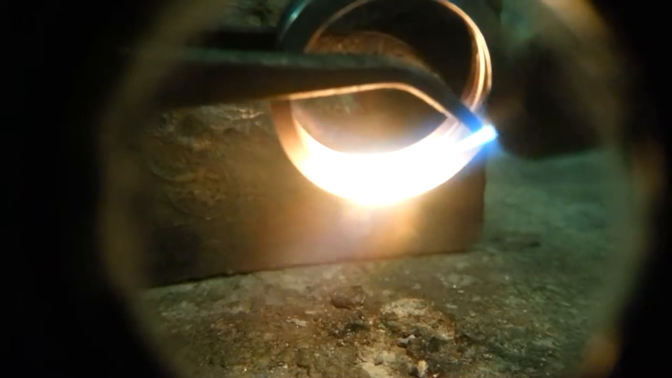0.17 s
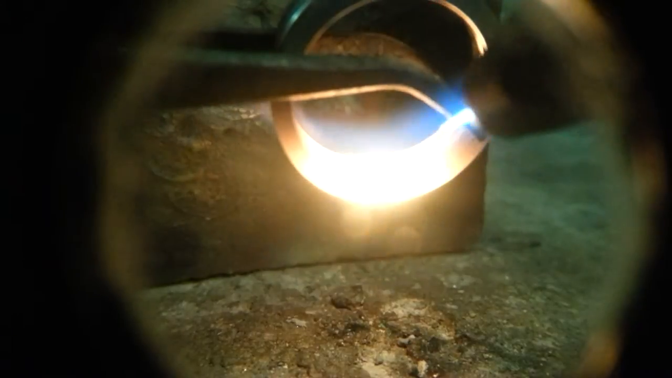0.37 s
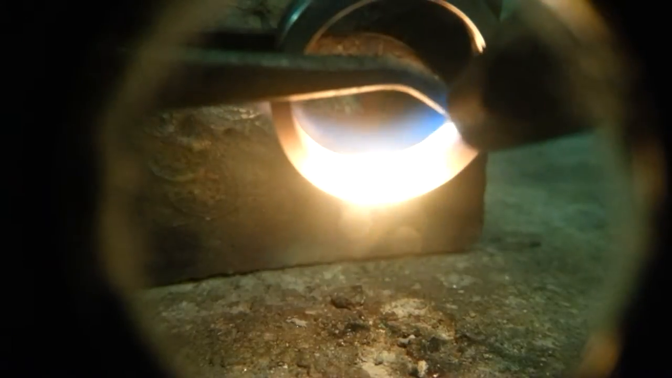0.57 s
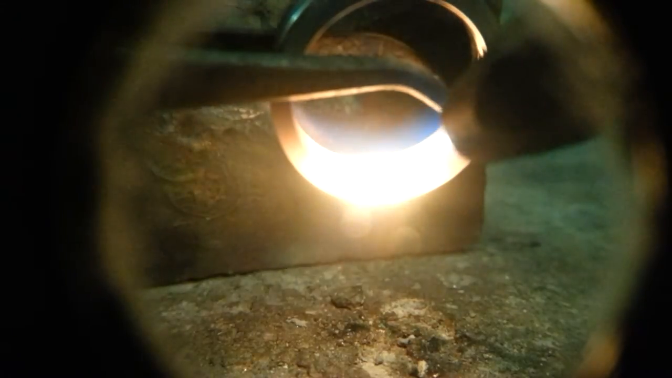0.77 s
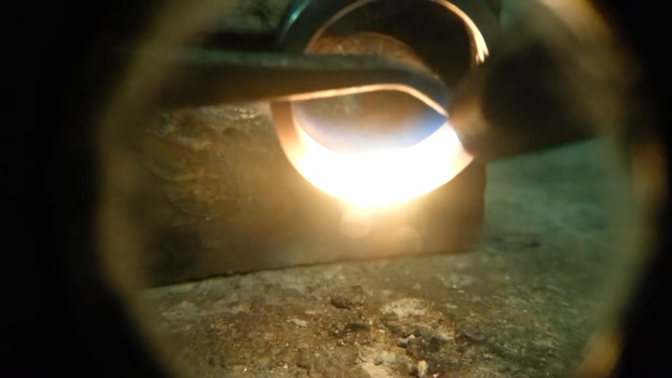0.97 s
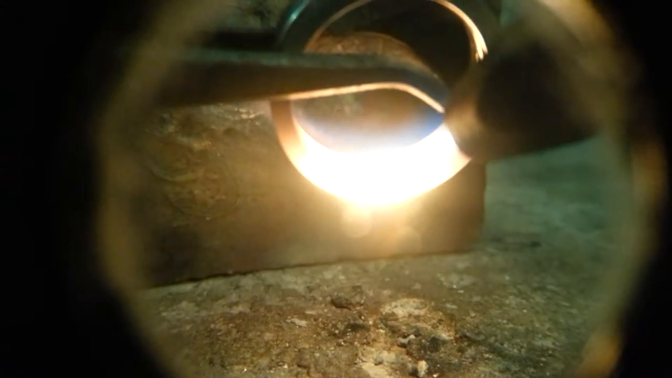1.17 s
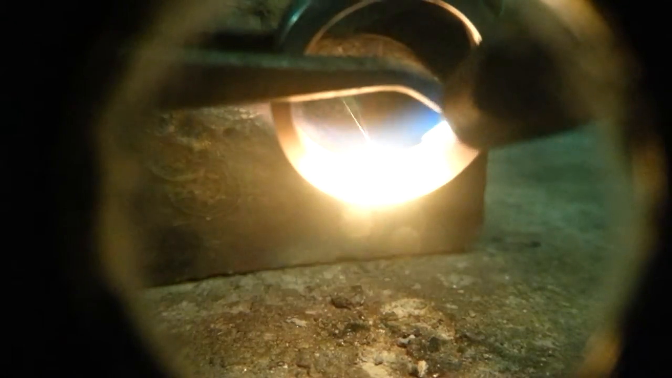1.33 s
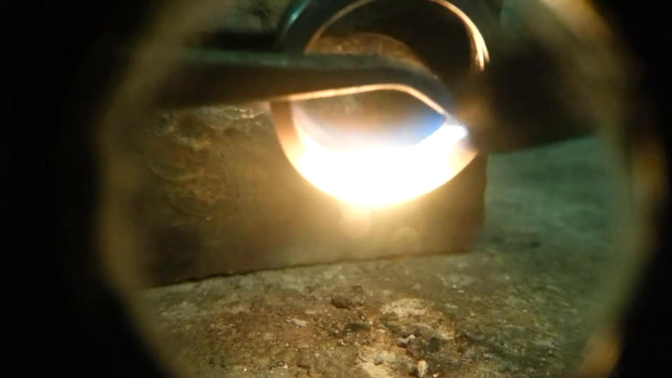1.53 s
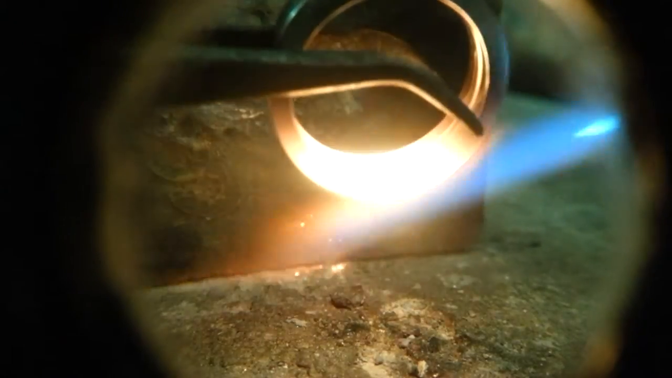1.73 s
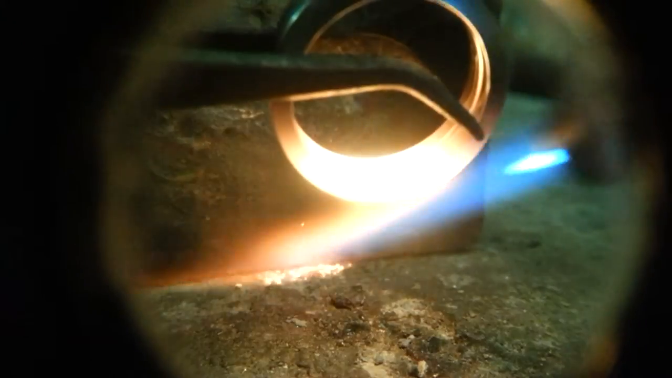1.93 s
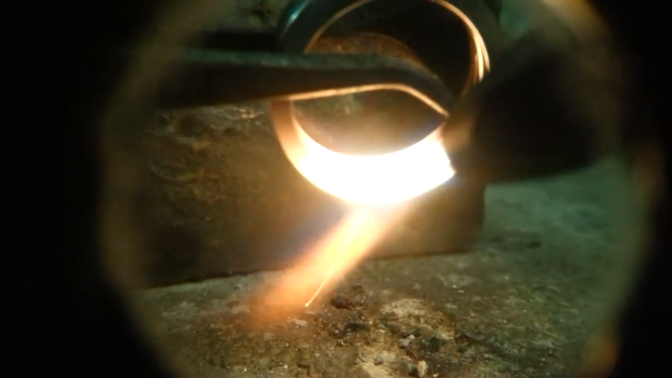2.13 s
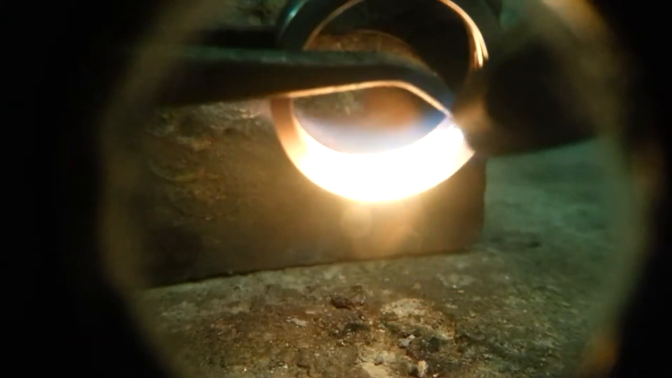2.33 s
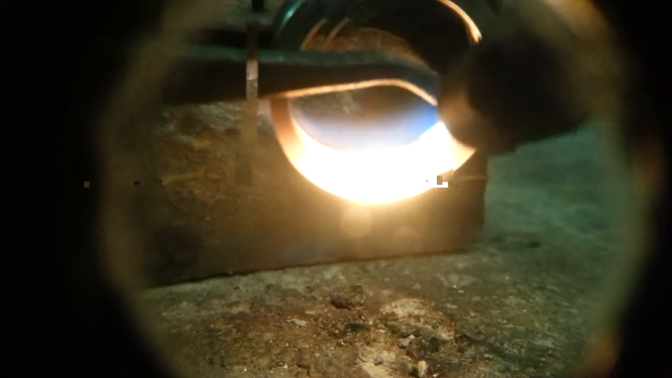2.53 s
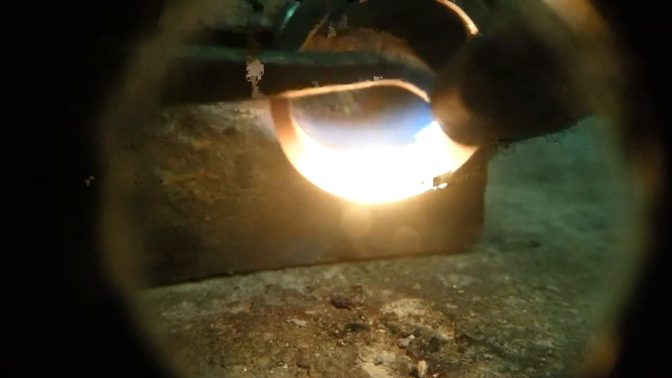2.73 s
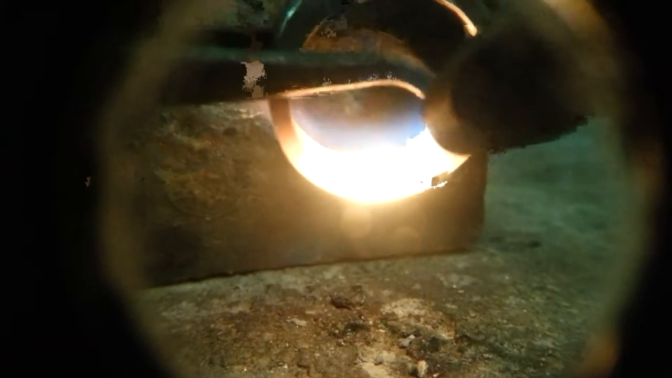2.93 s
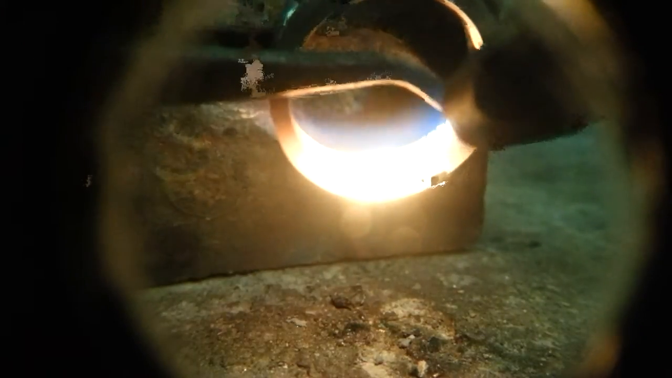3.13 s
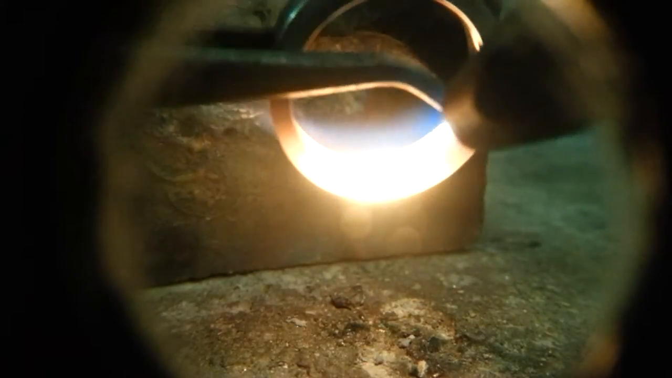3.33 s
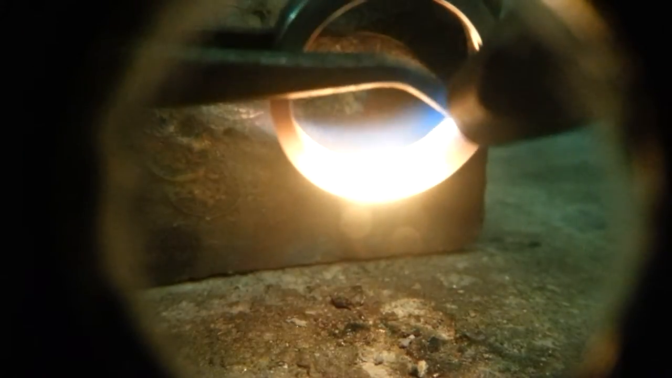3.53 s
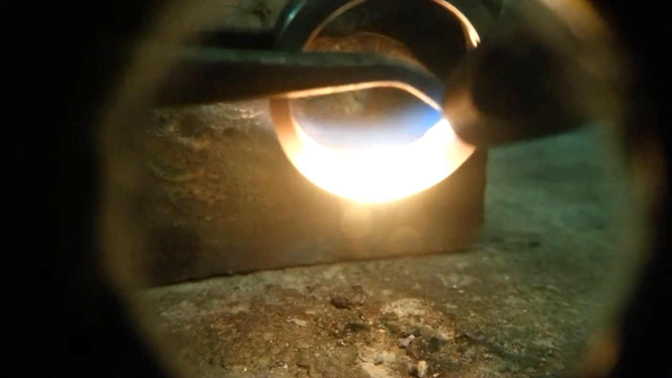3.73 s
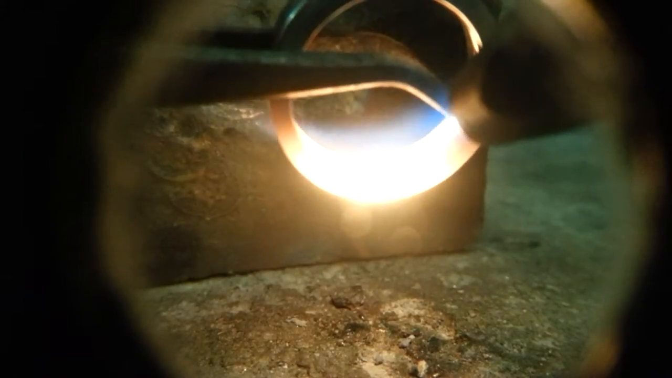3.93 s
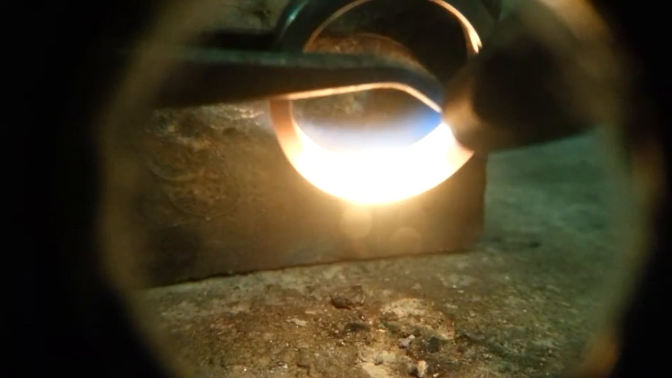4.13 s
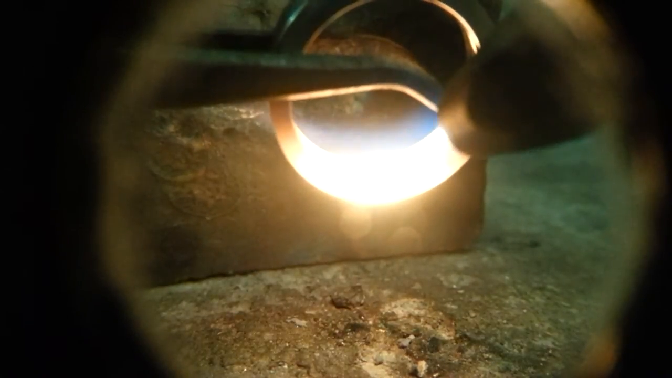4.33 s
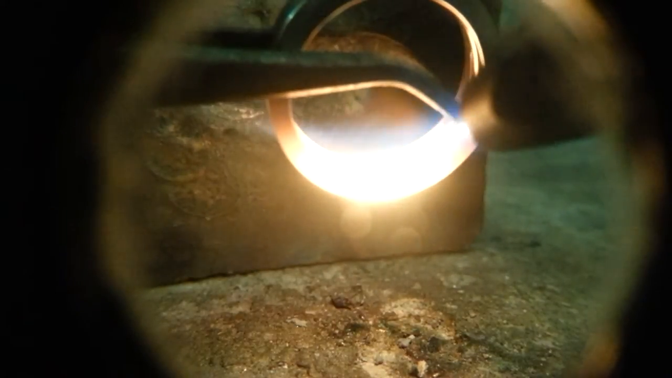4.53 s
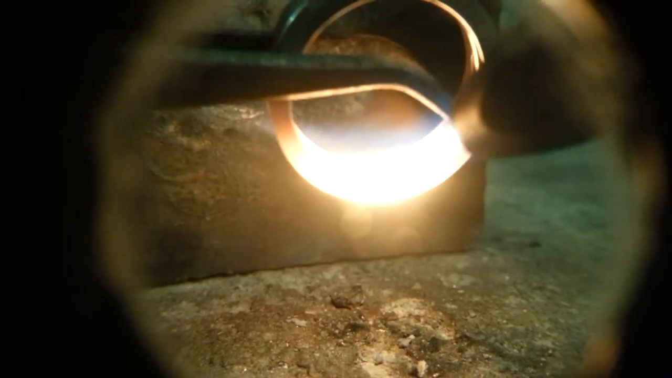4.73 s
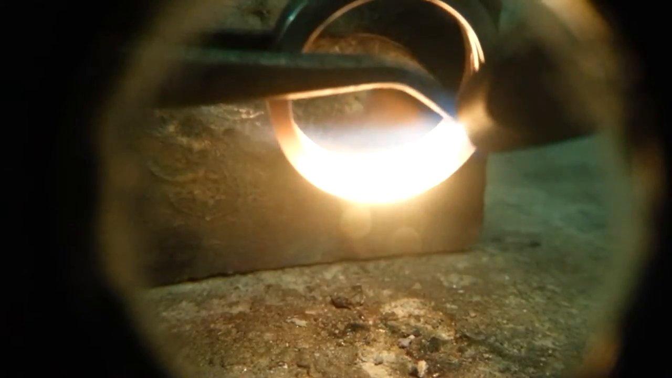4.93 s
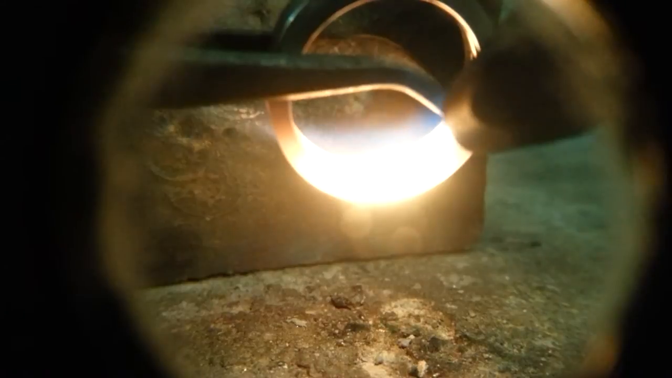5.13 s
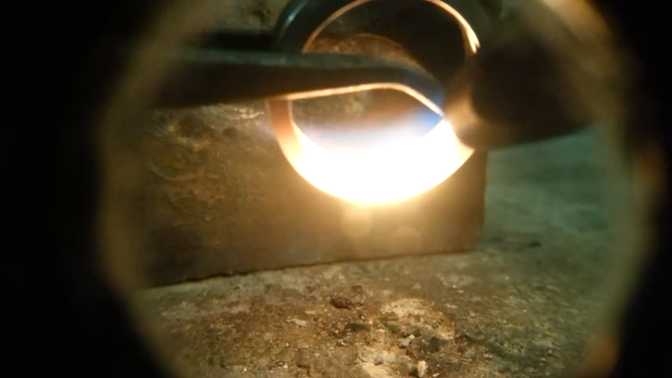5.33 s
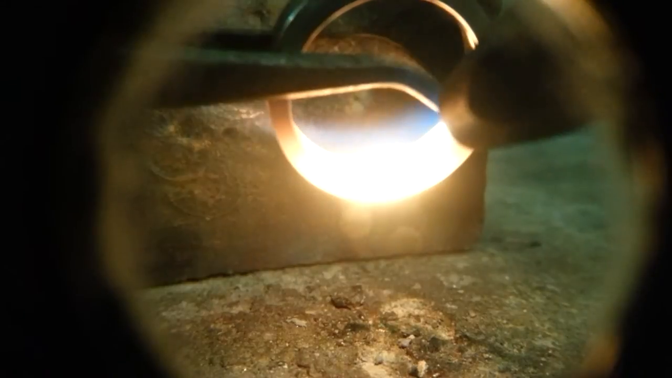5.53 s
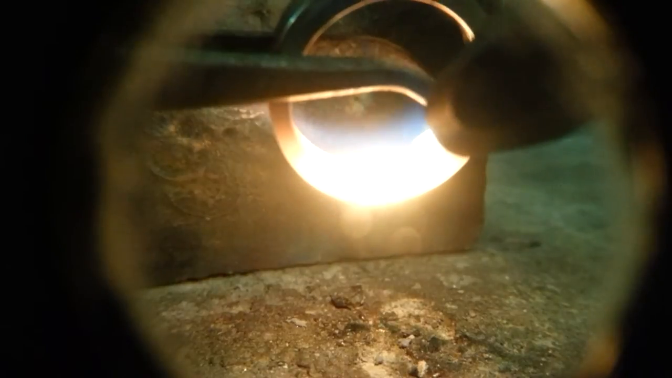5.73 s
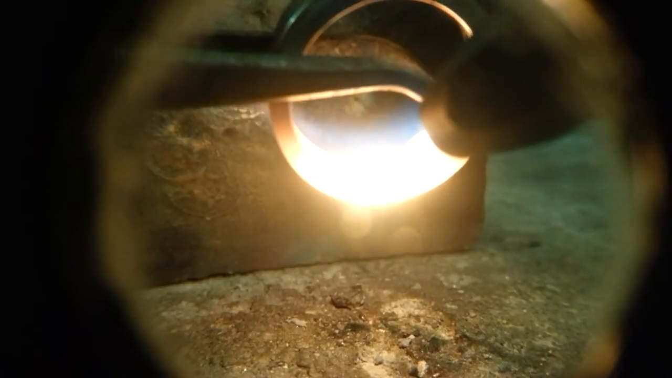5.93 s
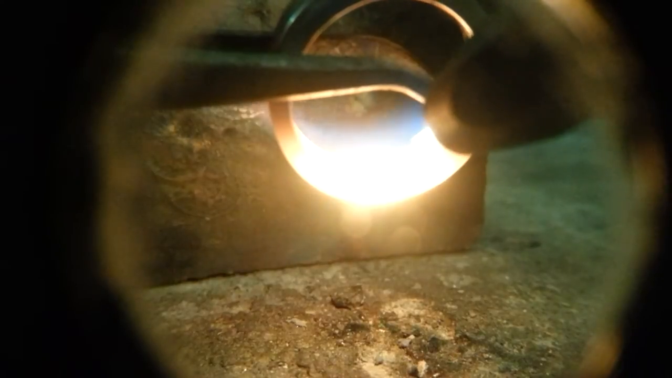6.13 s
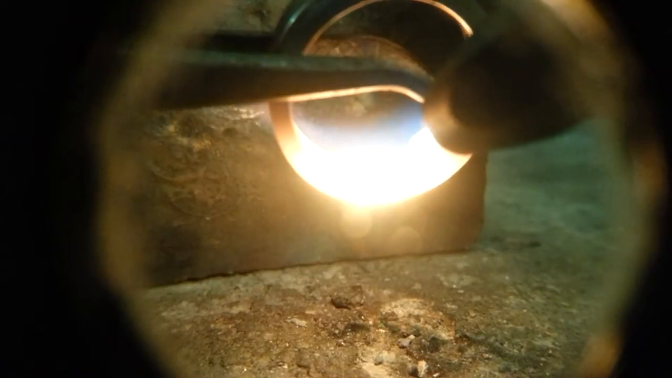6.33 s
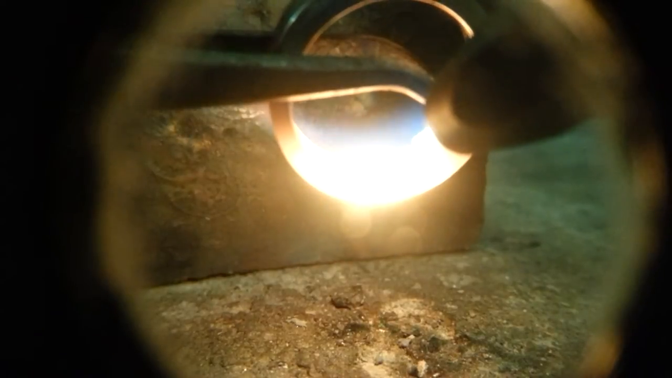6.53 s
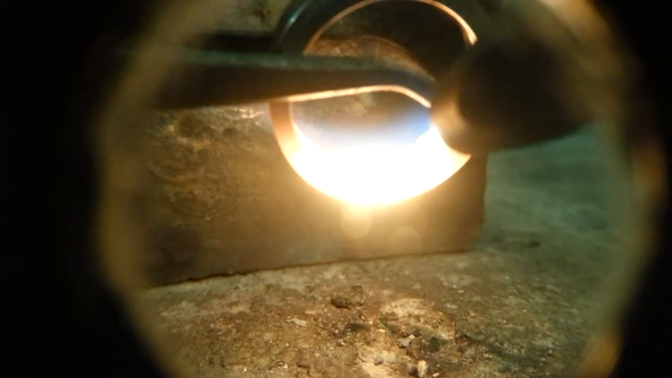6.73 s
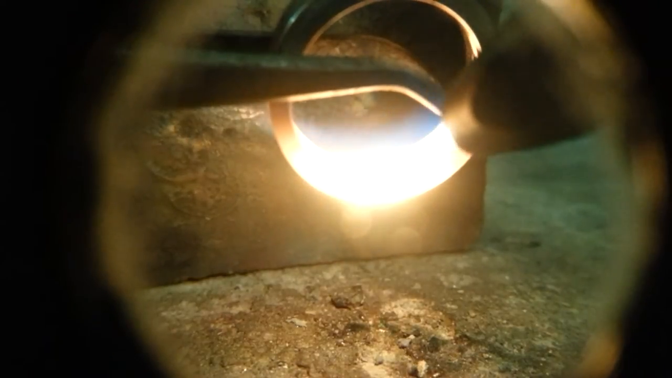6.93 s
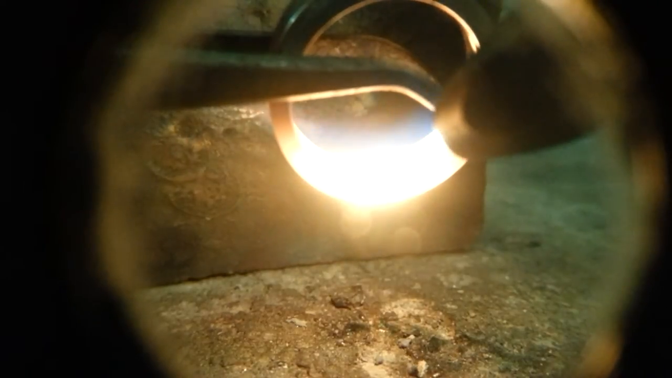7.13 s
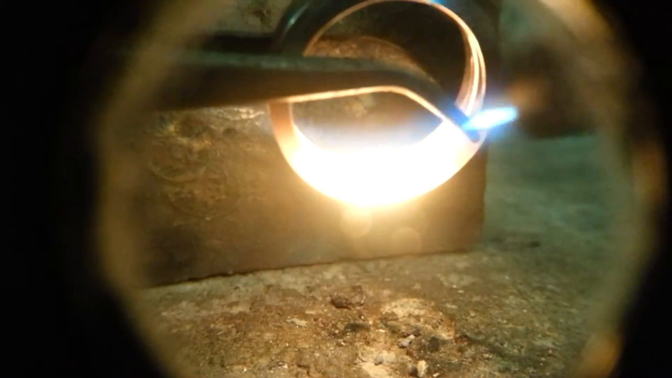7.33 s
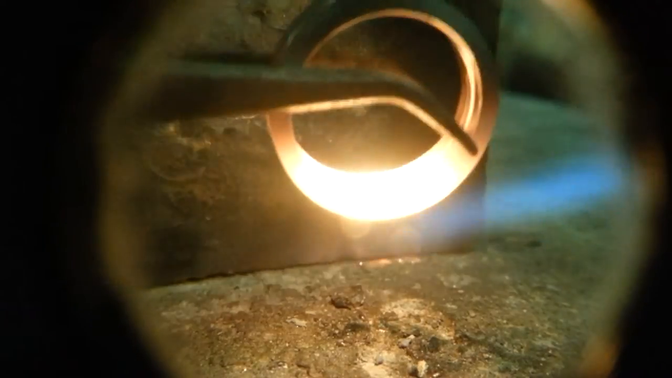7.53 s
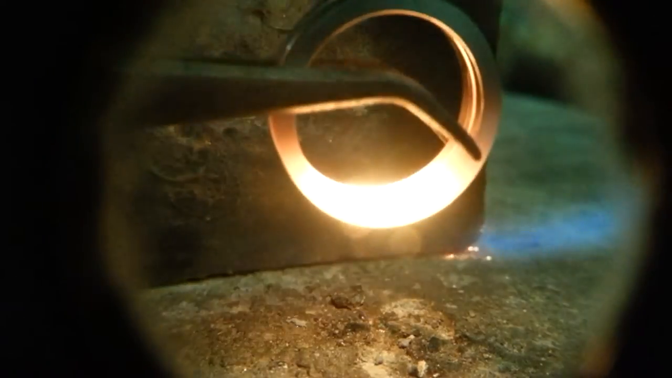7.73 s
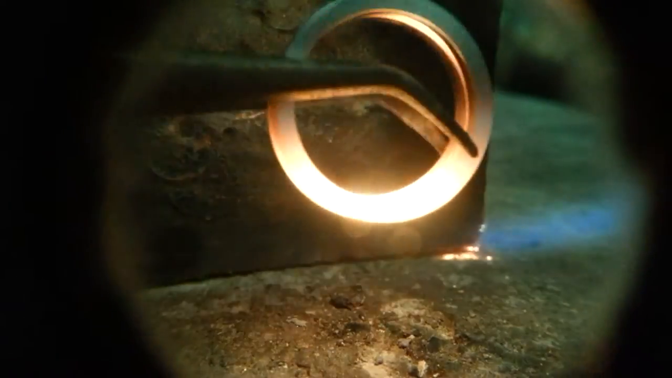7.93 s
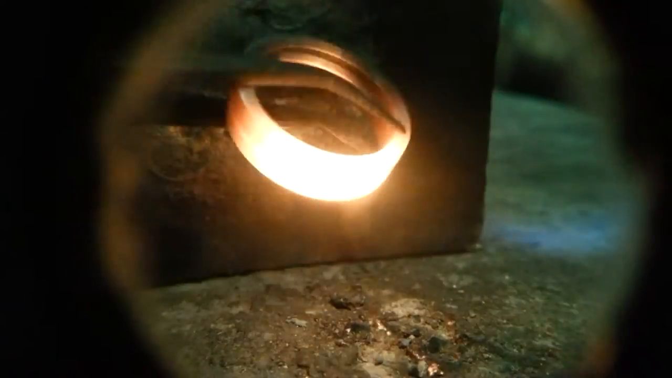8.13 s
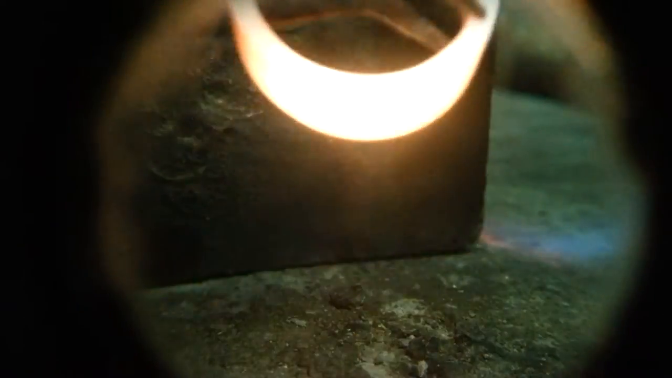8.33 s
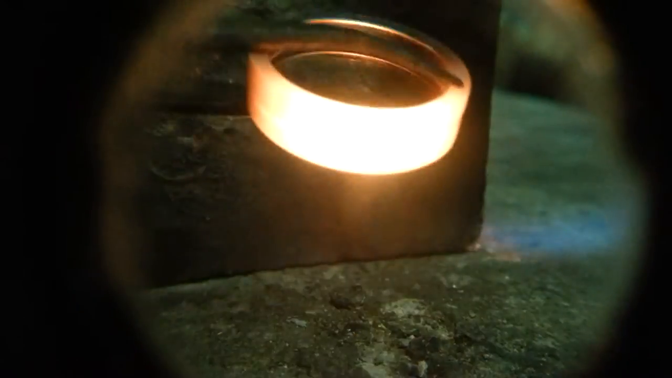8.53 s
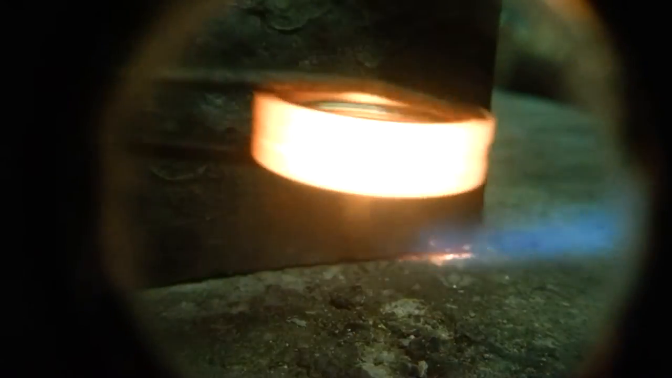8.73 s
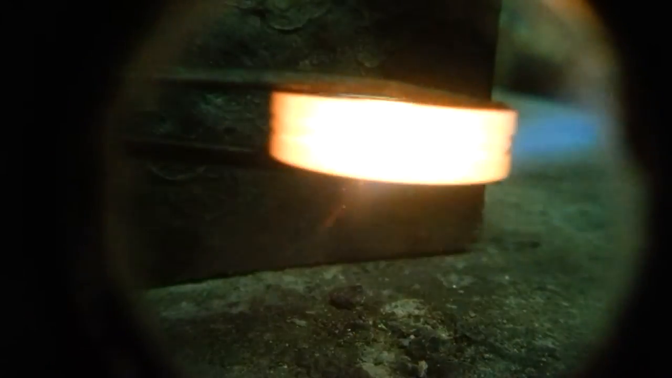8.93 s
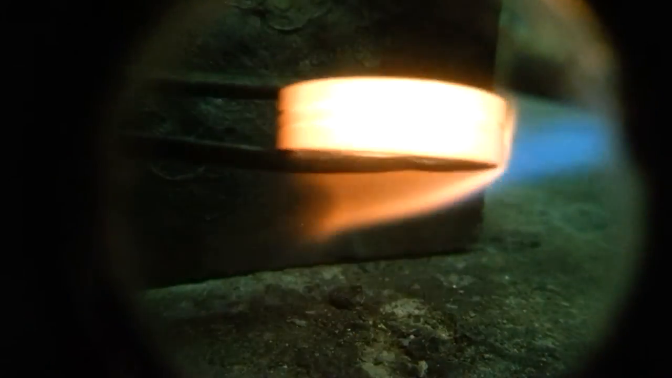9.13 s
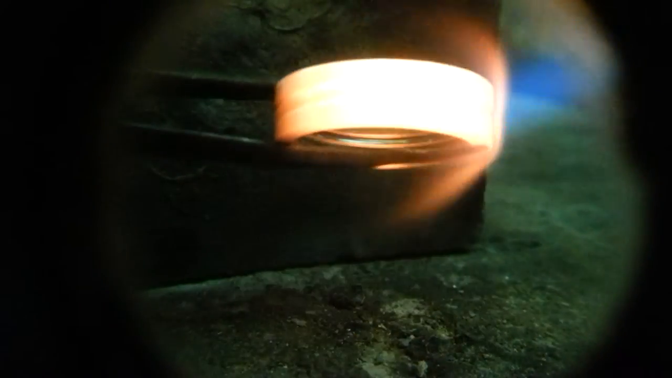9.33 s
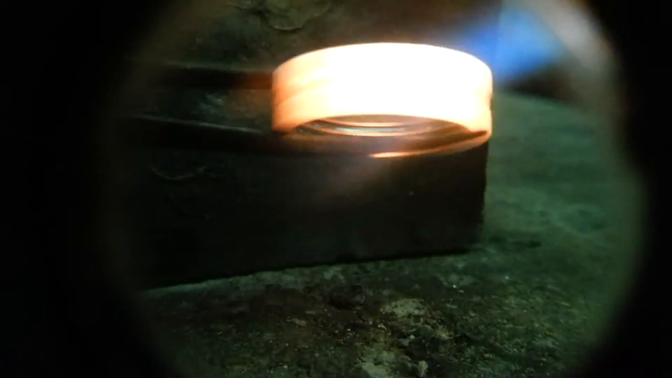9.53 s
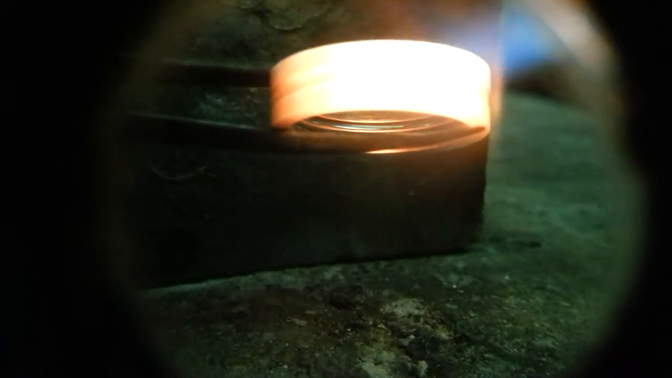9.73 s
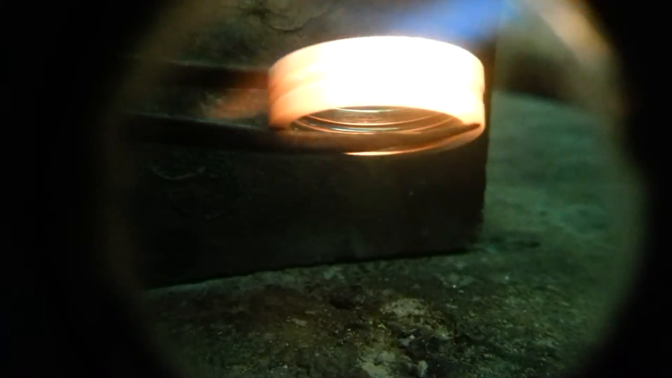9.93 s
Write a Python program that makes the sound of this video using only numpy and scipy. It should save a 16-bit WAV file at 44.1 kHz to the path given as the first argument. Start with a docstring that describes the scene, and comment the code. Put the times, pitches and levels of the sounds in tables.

```python
"""A gas torch plays on a metal ring over a soldering block, close to a small two-port microphone.
From the start, turbulent noise hisses into both ports by direct sound and short bounces off ring, tweezers
and block. The torch goes from beside the ring to its rim, aside and back, then inside; low noise roars on metal.
From about 7.5 s it passes to the block, far off and above, the roar mostly low; decaying partials make one
tweezer knock at 8.2 s, and narrow-band noise makes faint tones of hum to the end."""
import sys
import numpy as np
from scipy import signal
from scipy.fft import rfft, irfft
from scipy.io import wavfile
from scipy.ndimage import uniform_filter1d

SR = 44100
rng = np.random.default_rng(int(sys.argv[2]) if len(sys.argv) > 2 else 0)


def materialize(psi):
    """Save the field psi as 16-bit PCM at rate SR to the path in sys.argv[1].

    A 1-D psi becomes a single channel; in a 2-D psi each row is a channel.
    """
    bounded = np.clip(np.atleast_2d(psi).T, -1, 1)
    quanta = np.round(bounded * 32767).astype(np.int16)
    wavfile.write(sys.argv[1], SR, quanta)


N = 440552

# where the torch is held, one place fading into the next between rows: time_s, place, bounce_length_factor
TORCH_MOVES = [(0, "beside", 0.88), (.25, "rim", 1.02), (1.6, "rim", 1.023), (1.78, "beside", 1.01),
               (2.06, "beside", 1.02), (2.22, "rim", 1.03), (2.7, "inside", 1.006), (7.18, "inside", 1.002),
               (7.3, "inside", 1.02), (7.6, "block", 0.98), (7.75, "block", 1.01), (8.4, "block", 1.06),
               (8.58, "block", 1.054), (8.7, "block", 1.47), (8.86, "far", 0.992), (9.25, "far", 1),
               (9.4, "above", 1.07), (9.7, "above", 1.02), (10, "above", 0.98)]
# arrival at the ports, by place: left_lag_ms (behind right), scattered_share_db (near 2 kHz), rise_db_per_octave
ARRIVAL = {"rim": (0.199, -4, 3.7), "inside": (0.2, -6, 3.58), "beside": (0.24, -4.5, 1.7),
           "block": (0.334, -3.5, 3.7), "far": (0.328, -7, 2), "above": (0.3, -4, 2.6)}
# spectrum of the jet as it reaches the ports, by place: frequency_hz, left_db, right_db
JET_SPECTRA = {"rim": [(447, -25.5, -20), (790, -20, -32), (1445, 9.5, -9), (2604, -10, -29),
               (4580, -29.5, -19), (7960, -30, -28.5), (14500, -30.5, -22)], "inside": [(455, -29, -24.5),
               (833, -9, -20.5), (1490, 9.5, -11.5), (2630, -8.5, -24), (4700, -30, -18), (7640, -28, -26),
               (14400, -27.5, -21)], "beside": [(437, -32, -24), (764, -26, -26.5), (1580, 11, -6),
               (2560, -19, -22.5), (4600, -23, -18), (8500, -29.5, -23), (14500, -30, -14.5)],
               "block": [(486, -24, -28.5), (800, -11, -18), (1500, 7.5, -13), (2530, -8.5, -11),
               (4720, -26, -18.5), (8000, -28, -19), (14500, -27.5, -20.5)], "far": [(450, -24.5, -15.5),
               (800, -14, -16), (1520, 1.5, -19), (2640, -5, -14), (4850, -25, -9.5), (8100, -30, -14.5),
               (14500, -25, -13)], "above": [(452, -42, -23.5), (825, -12, -27.5), (1530, 3, -13),
               (2600, -3.5, -21.5), (4500, -24.5, -9.5), (7700, -28, -22.5), (14500, -26, -17)]}
# reflections into the left port, by place: delay_ms (after the direct sound), pressure_ratio
LEFT_BOUNCES = {"rim": [(0.316, -0.66), (0.518, -0.012), (0.668, 0.34), (0.728, -0.45), (0.961, -0.19),
                (1.455, -0), (1.529, -0.65), (1.563, 0.52), (1.889, 0.11), (2.205, -0.13)],
                "inside": [(0.314, -0.7), (0.507, -0.19), (0.668, 0.45), (0.722, -0.53), (0.977, -0.23),
                (1.275, 0.12), (1.45, 0.073), (1.538, -0.38), (1.577, 0.29), (1.733, 0.012), (1.893, 0.032),
                (2.205, -0.026)], "beside": [(0.084, 0.94), (0.314, -0.2), (0.604, -0.77), (0.761, -0.9),
                (0.785, 0.93), (0.813, -0.077), (1.285, 0.074), (1.491, -0.31), (1.799, -0.2)],
                "block": [(0.151, -0.27), (0.408, -0.083), (0.731, 0.11), (1.043, -0.025), (1.187, 0.089),
                (1.262, -0.18), (1.408, 0.16), (1.746, -0.25), (2.168, 0.21)], "far": [(0.246, -0.55),
                (0.41, -0.9), (0.471, 0.38), (0.595, 0.22), (0.739, 0.39), (1.049, -0.019),
                (1.498, -0.025)], "above": [(0.136, 0.82), (0.417, -0.63), (0.76, 0.41), (1.159, -0.23),
                (1.317, 0.12), (1.368, -0.1)]}
# reflections into the right port, by place: delay_ms (after the direct sound), pressure_ratio
RIGHT_BOUNCES = {"rim": [(0.243, -0.67), (0.32, -0.5), (0.416, -0.21), (0.706, -0.82), (0.768, -0.28),
                 (0.844, -0.14), (1.252, -0.53), (1.672, 0.034)], "inside": [(0.164, 0.3), (0.246, -0.77),
                 (0.323, -0.58), (0.413, -0.3), (0.709, -0.61), (0.778, -0.37), (0.862, -0.43),
                 (0.964, -0.31), (1.24, -0.33), (1.655, 0.27)], "beside": [(0.228, 0.47), (0.433, -0.22),
                 (0.788, -0.26), (1.168, 0.16), (1.803, -0.12)], "block": [(0.102, 0.27), (0.257, 0.59),
                 (0.682, 0.22), (0.738, 0.063), (1.081, -0.2), (1.44, 0.049)], "far": [(0.136, -0.57),
                 (0.304, -0.38), (0.71, 0.1), (0.766, 0.26), (1.086, -0.17), (1.386, 0.17), (1.759, 0.1)],
                 "above": [(0.32, 0.38), (0.356, -0.33), (0.463, -0.69), (0.548, -0.47), (1.14, 0.38),
                 (1.206, 0.19), (1.358, -0.36), (2.041, 0.24)]}
# peaks and dips of the housing, left list then right list: centre_hz, width_hz, gain_db
PORT_RESONANCES = [(1063, 284, -13.5), (1475, 410, -16), (2157, 35, -14.5), (3120, 460, -4.5),
                   (3233, 100, 11), (3430, 110, -2.5), (3950, 130, -5), (4150, 130, -4.5), (5630, 200, -8),
                   (9200, 440, -14), (13800, 620, -8)], [(1028, 210, 5), (1830, 1076, 12.5),
                   (2090, 27, -20), (2470, 91, 3.5), (2900, 70, -2), (3350, 61, 7.5), (3965, 194, -10),
                   (4860, 200, -10.5), (14830, 2070, -19.5)]
# relative spectral density of the roar: frequency_hz, density_db (per Hz)
ROAR_SPECTRUM = [(15, -78), (25, -48), (81, -42), (116, -18.5), (189, -2), (303, -1.5), (406, -4.5),
                 (635, -14), (700, 5), (910, -1.5), (1540, -120)]
# moments when the flame leaves the metal and the roar drops away: start_s, end_s, drop_db
LIFTS = [(1.71, 2.12, -11), (7.48, 9.3, -11.5), (9.614, 10.2, -8.5)]
# slow drift of the jet: time_s, strength_db, treble_lift_db_per_octave (above 5 kHz)
JET_DRIFT = [(0, 2.7, -1.5), (1.6, 1.8, -2), (2, 2.5, -2), (2.4, 1.8, -2.5), (3.1, 0.7, -2),
             (7.3, 0.85, -2.7), (8.4, 0.43, -1), (9.2, 0.7, -2), (10, 0.9, -1.8)]
# contacts of the tweezers with the block: time_s, peak_db
KNOCKS = [(8.158, -9)]
# partials of the tweezers: frequency_hz, relative_level_db, decay_60db_s
TWEEZER_PARTIALS = [(680, 1, .07), (370, -13, .045), (1250, 4, .035), (1650, 5, .03), (1950, 3, .03)]
# faint fuzzy tones that come and go: start_s, length_s, pitch_hz, level_db
HUM_TONES = [(7.57, 0.55, 338, -42.5), (7.95, 0.24, 247, -46), (8.5, 0.57, 247, -45),
             (8.946, 0.31, 251, -54), (9.45, 0.54, 245, -45)]

SIZE, HOP = 1024, 256  # short-time spectrum, samples
HZ = np.fft.rfftfreq(SIZE, 1 / SR)
TIMES = np.arange(N // HOP + 5) * HOP / SR  # frame times, s

JET_DB = -1.91
RING_HZ, RING_WIDTH_HZ, RING_CLEAR_DB = 1680, 890, -6  # near this resonance less sound is scattered
SHARED_DIPS = 0.15  # how far the scattered sound follows the dips of the bounces, 0-1

ROAR_DB, ROAR_SAG_DB_PER_S = -34, -0.27
ROAR_PAN_DB, ROAR_ALIKE = -2.5, 0.76  # left over right; correlation of the ports
LIFT_S = 0.034  # time to leave or regain the metal
FLUTTER_ON_DB, FLUTTER_OFF_DB = 1, 3.5  # rms flutter on the metal and off it
# while the roar is low: loss of the deepest part, added rms unevenness of the noise
LIFT_BASS_DB, LIFT_UNEVEN_DB = -11, 4.5

HUM_WIDTH_HZ = 2.9
LOW_CUT_HZ, EDGE_HZ = 106, 14520
LIMIT_DB, LIMIT_SHARE = -13.5, 0.24  # threshold; share of the excess dB removed


def gain_of(db):
    """Logarithmic level: 20 dB is a tenfold pressure ratio."""
    return 10 ** (np.asarray(db) / 20)


def evened(x):
    """Normalisation: division by the root mean square gives rms 1."""
    return x / np.sqrt(np.mean(abs(x) ** 2))


def read(hz, value):
    """Logarithmic frequency scale: a spectrum table is interpolated on every bin."""
    return np.interp(np.log(HZ + 1), np.log(np.add(hz, 1)), value)


def resonance(centre_hz, width_hz):
    """Resonance curve: a bell of height 1, half as high at half its width from the centre."""
    return 1 / (1 + (2 * (HZ - centre_hz) / width_hz) ** 2)


def causal(db):
    """Minimum phase: folding the cepstrum forward gives this gain with the least delay."""
    folded = irfft(db * np.log(10) / 20)
    folded[1:SIZE // 2] *= 2
    folded[SIZE // 2 + 1:] = 0
    return np.exp(rfft(folded))


def chance():
    """White noise: short-time spectra of a random signal that plays back at rms 1."""
    noise = rng.standard_normal((len(TIMES) - 1) * HOP)
    return signal.stft(noise, nperseg=SIZE, noverlap=SIZE - HOP)[2]


def patches(bins, frames):
    """Random modulation: noise smoothed over frequency and time leaves blotches of rms 1."""
    field = rng.standard_normal((len(TIMES), len(HZ))).T
    field = uniform_filter1d(field, round(bins), axis=0)
    return evened(uniform_filter1d(field, round(frames), axis=1))


def pair(left, right, cross, field_db):
    """Partial coherence: two noises of these powers and cross-spectrum swell together by field_db."""
    alike = cross / np.sqrt(left * right)
    first, second = chance(), chance()
    left_noise = np.sqrt(left) * first
    independent = np.sqrt(abs(1 - abs(alike) ** 2)) * second
    right_noise = np.sqrt(right) * (alike * first + independent)
    spectra = np.array([left_noise, right_noise]) * gain_of(field_db)
    return signal.istft(spectra, nperseg=SIZE, noverlap=SIZE - HOP)[1][:, :N]


def jet():
    """Turbulence noise: gas from the nozzle, heard along the paths of each place in turn."""
    s, places, stretch = map(np.array, zip(*TORCH_MOVES))
    blend = np.zeros((3, len(HZ), len(TIMES)), complex)
    for place in ARRIVAL:
        here = places == place
        share = np.interp(TIMES, s, here)
        now = share > 0
        place_stretch = np.interp(TIMES[now], s[here], stretch[here])
        blend[..., now] += share[now] * paths(place, place_stretch)

    s, strength_db, treble_db = np.transpose(JET_DRIFT)
    treble = np.clip(np.log2(HZ / 5000 + 1e-3), 0, 2)[:, None]  # octaves above 5 kHz
    bass = np.clip(3.4 - HZ / 230, 0, 1)[:, None]
    field_db = JET_DB + np.interp(TIMES, s, strength_db) + treble * np.interp(TIMES, s, treble_db)
    field_db = field_db + 1.17 * patches(6, 10)  # eddies
    field_db = field_db + .5 * treble * patches(134, 11.5)  # the treble flickers
    field_db = field_db + 2.64 * bass * patches(3, 14.4)  # the low end of the hiss comes in gusts
    small_jet_db = -10 * np.log10(1 + (520 / (HZ + 1)) ** 10)  # a small jet makes no bass
    field_db = field_db + small_jet_db[:, None]
    return pair(blend[0].real, blend[1].real, blend[2], field_db)


def paths(place, stretch):
    """Interference: direct sound and stretched bounces give left power, right power and cross-spectrum."""
    lag_ms, scatter_db, rise_db = ARRIVAL[place]
    hz, *jet_db = np.transpose(JET_SPECTRA[place])
    clear_db = RING_CLEAR_DB * resonance(RING_HZ, RING_WIDTH_HZ)
    # a long flame is many sources, so part of the sound arrives scattered
    scattered = gain_of(scatter_db + rise_db * np.log2(HZ / 2000 + 0.11) + clear_db) ** 2
    fine_hz = np.arange(0, SR, 5.)
    direct, power = [], []
    for db, port, bounces in zip(jet_db, PORT_RESONANCES, (LEFT_BOUNCES, RIGHT_BOUNCES)):
        housing_db = sum(g * resonance(f, width) for f, width, g in port)
        colour = causal(read(hz, db) + housing_db)[:, None]
        comb = 1 + sum(ratio * np.exp(-2j * np.pi * fine_hz * ms / 1000) for ms, ratio in bounces[place])
        # longer paths lower the frequency of every dip
        comb = comb[(np.outer(HZ, stretch) / fine_hz[1]).astype(int)]
        spread = scattered[:, None] * abs(comb) ** (2 * SHARED_DIPS)
        direct.append(colour * comb)
        power.append(abs(colour) ** 2 * (abs(comb) ** 2 + spread))
    lag = np.exp(-2j * np.pi * HZ * lag_ms / 1000)[:, None]
    cross = np.conj(direct[0] * lag) * direct[1]
    return np.array([*power, cross])


def roar():
    """Combustion noise: lumpy low burning where the flame breaks on metal or stone."""
    ramps = [np.clip(np.minimum(TIMES - start, end - TIMES) / LIFT_S, 0, 1) for start, end, _ in LIFTS]
    off_metal = sum(ramps)
    drop_db = np.transpose(LIFTS)[2] @ ramps
    flutter = evened(uniform_filter1d(rng.standard_normal(len(TIMES)), size=10))
    # the roar flutters more when the flame is off the metal
    flutter_db = flutter * (FLUTTER_ON_DB + (FLUTTER_OFF_DB - FLUTTER_ON_DB) * off_metal)
    level_db = ROAR_DB + ROAR_SAG_DB_PER_S * TIMES + drop_db + flutter_db

    power = gain_of(read(*np.transpose(ROAR_SPECTRUM)))[:, None] ** 2
    power = power / power.mean()
    bass = np.clip(2 - HZ / 120, 0, 1)[:, None]
    lumps_db = 6.9 * patches(3, 13) * bass + 0.98 * patches(30, 8)
    # the noise is more uneven while the roar is low
    lumps_db = lumps_db + (2.0 + LIFT_UNEVEN_DB * off_metal) * patches(3, 12.8)
    deepest = np.clip(3 - HZ / 70, 0, 1)[:, None]
    lumps_db = lumps_db + LIFT_BASS_DB * off_metal * deepest
    sound = pair(power, power, ROAR_ALIKE * power, level_db + lumps_db)
    return sound * gain_of([[ROAR_PAN_DB / 2], [-ROAR_PAN_DB / 2]])


def knocks():
    """Modal decay: the tweezers touch the block and their partials die away; being small, they give no bass."""
    t, blows = np.arange(4000) / SR, np.zeros(N)
    ring = sum(gain_of(db - 60 * t / t60) * np.sin(2 * np.pi * hz * t) for hz, db, t60 in TWEEZER_PARTIALS)
    ring = signal.sosfilt(signal.butter(4, 230, "highpass", fs=SR, output="sos"), ring)
    for s, db in KNOCKS:
        blows[round(s * SR)] = gain_of(db)
    return signal.oaconvolve(blows, ring / abs(ring).max())[:N]


def hum():
    """Narrow-band noise: each tone swells and fades, wandering a little in pitch and strength."""
    t, out = np.arange(N) / SR, 0
    keep = np.exp(-np.pi * HUM_WIDTH_HZ / SR)
    noise = rng.standard_normal(N) + 1j * rng.standard_normal(N)
    drift = evened(signal.lfilter([1], [1, -keep], noise))
    for s, length, hz, db in HUM_TONES:
        swell = np.sin(np.pi * np.clip((t - s) / length, 0, 1))
        tone = (drift * np.exp(2j * np.pi * hz * t)).real
        out = out + gain_of(db) * swell * tone
    return out


def scene():
    """Superposition: the pressures of all sources add at the two ports."""
    return jet() + roar() + knocks() + hum()


def record(dry):
    """Compression and filtering: a quick gain control leans on loud moments, then low cut and band limit."""
    power = uniform_filter1d((dry ** 2).mean(0), size=130)
    power_db = 10 * np.log10(abs(power) + 1e-12)
    over_db = uniform_filter1d(np.maximum(power_db - LIMIT_DB, 0), size=130)
    held = dry / gain_of(LIMIT_SHARE * over_db)
    thin = signal.sosfilt(signal.butter(2, LOW_CUT_HZ, "highpass", fs=SR, output="sos"), held)
    band = signal.firwin(2047, EDGE_HZ, window=("kaiser", 9), fs=SR)
    return np.clip(signal.oaconvolve(thin, band[None], "same"), -1, 1)


dry = scene()
out = record(dry)
materialize(out)
```